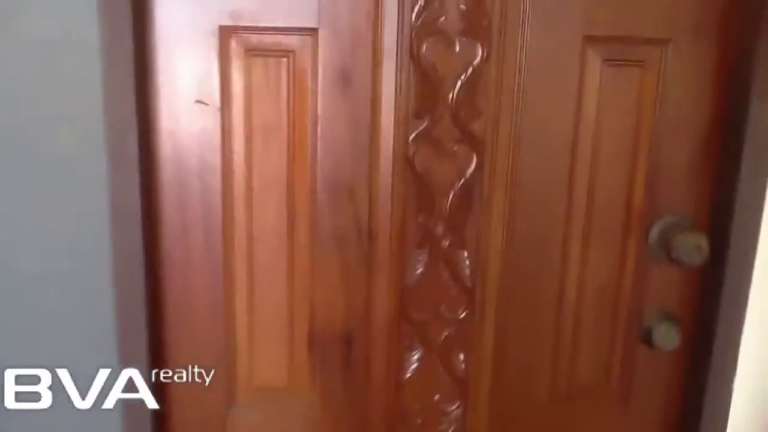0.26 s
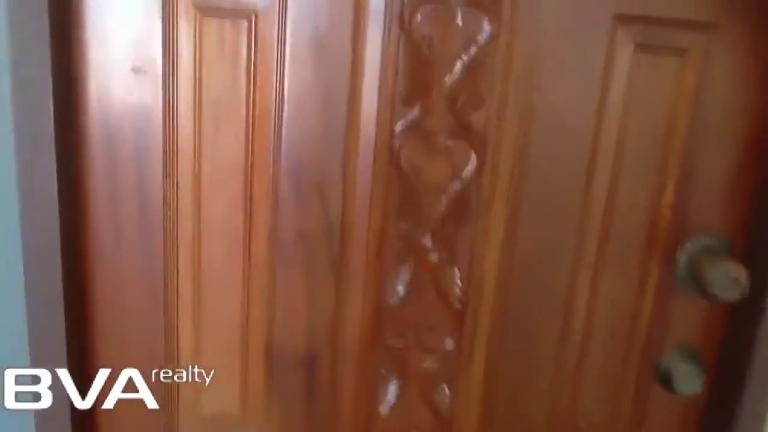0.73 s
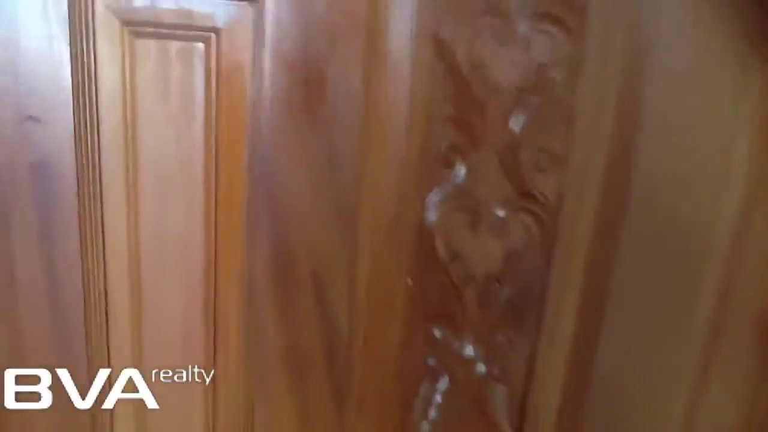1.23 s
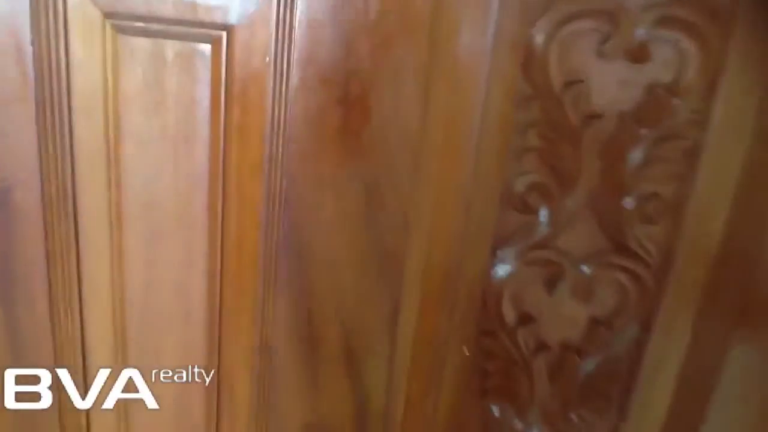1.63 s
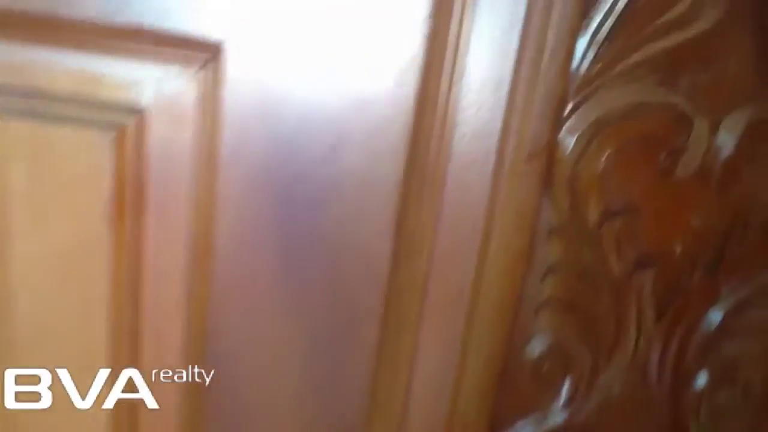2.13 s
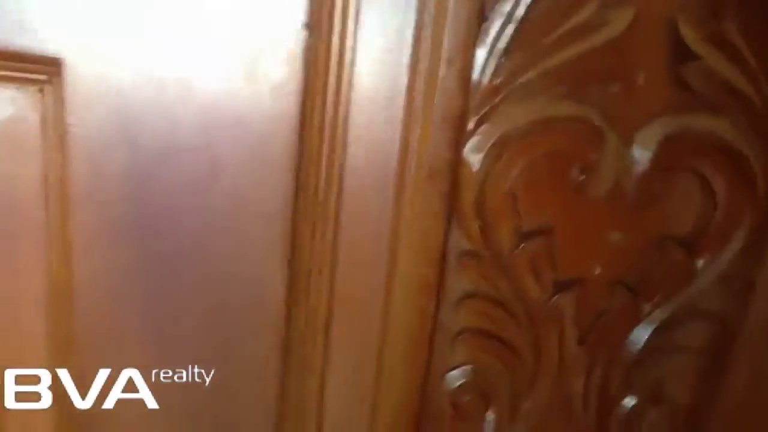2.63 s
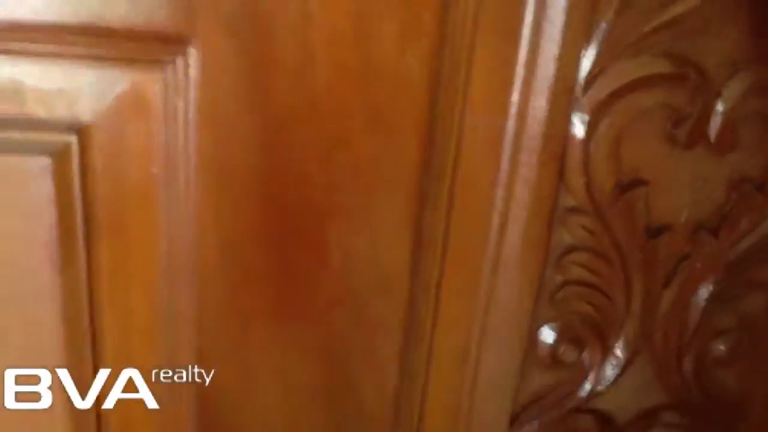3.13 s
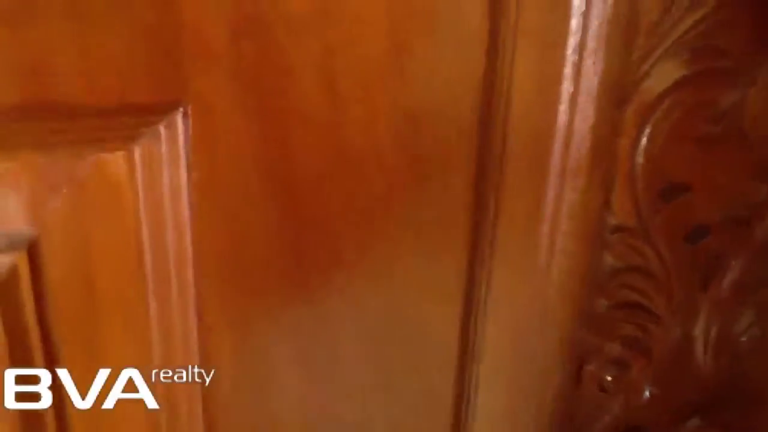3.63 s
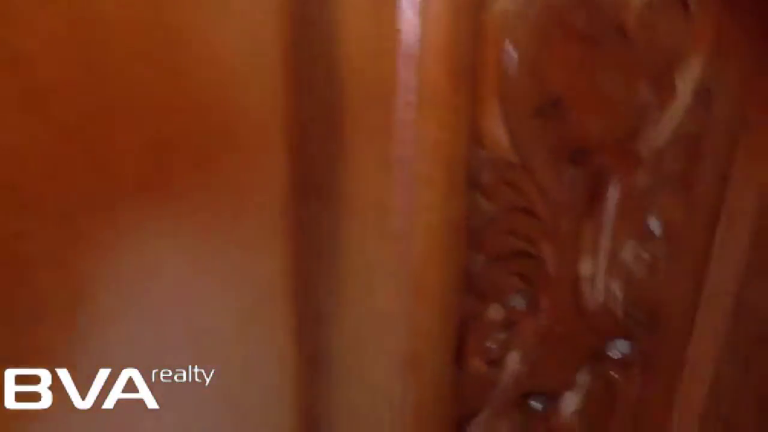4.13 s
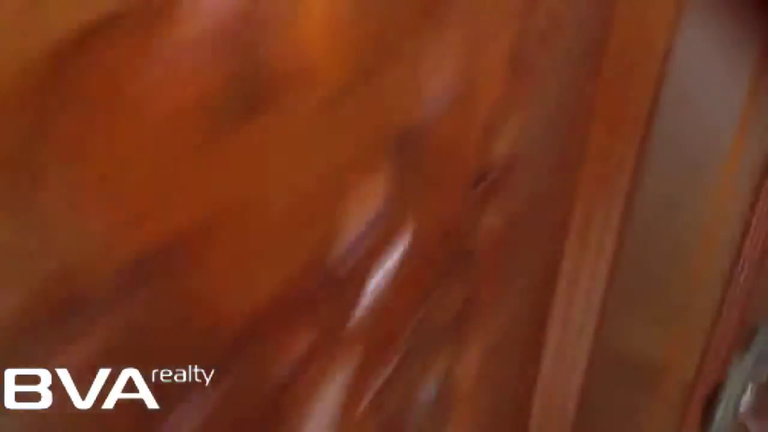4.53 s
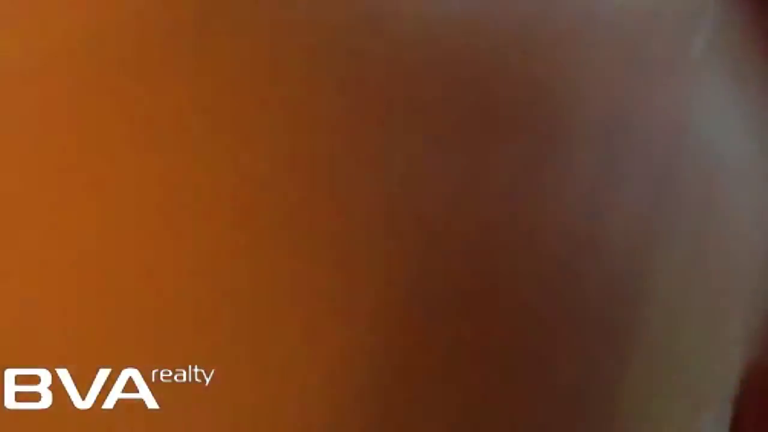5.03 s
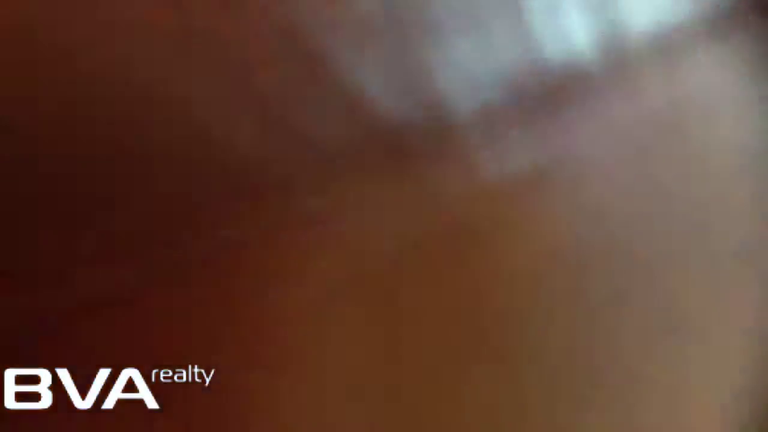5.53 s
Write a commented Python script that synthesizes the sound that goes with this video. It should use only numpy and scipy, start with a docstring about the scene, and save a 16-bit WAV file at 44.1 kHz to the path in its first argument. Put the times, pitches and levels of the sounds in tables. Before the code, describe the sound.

A heavy wooden door is unlatched and swung open indoors, with a little echo from hard walls. Metal clicks and wooden knocks come first, followed by short hinge squeals and a falling creak that breaks into sharp ticks. One soft step thuds with a rustle of clothing, and the hinge ticks again as the microphone moves up to the door. Ventilation hums and rushes quietly underneath throughout.

```python
"""Dry hinges of a heavy wooden door, unlatched and swung open in a hard-walled hall.
Stick-slip at the hinge groans, squeals, sinks into a creak and slows to single ticks.
The latch clicks first: bolt, spring and strike plate ring, the panel knocks.
A footstep and a brush of clothes follow, over ventilation hum and rush.
The door sounds drier as the listener moves up to it."""
import sys
import numpy as np
from scipy import signal
from scipy.fft import rfft, irfft, next_fast_len
from scipy.io import wavfile
from scipy.ndimage import map_coordinates

SR = 44100
rng = np.random.default_rng(int(sys.argv[2]) if len(sys.argv) > 2 else 0)


def digitize_waveform(pressure):
    """Quantize a signal to 16-bit integers and store it at the path in sys.argv[1].

    Rows of a 2-D input are taken as channels; values are limited to [-1, 1].
    """
    field = np.atleast_2d(pressure).T
    bounded = np.clip(field, -1, 1)
    quanta = np.round(bounded * 32767).astype(np.int16)
    wavfile.write(sys.argv[1], SR, quanta)


N = 254898

# First stiff turn; long squeal (time [s], slip rate [Hz], level [dB], overtone gain [dB])
GROAN_PATH = [(2.467, 515, -46, 4), (2.481, 530, -41.5, -1), (2.488, 586, -34.5, -9),
              (2.499, 588, -35, -10), (2.508, 615, -42, 0), (2.515, 635, -49, 7), (2.519, 612, -33.5, -17),
              (2.526, 595, -34, -18)]
SQUEAL_PATH = [(3.670, 824, -46, -1), (3.694, 805, -44.5, 0.5), (3.710, 842, -47, -7),
               (3.724, 826, -54, -2), (3.738, 802, -46, -7), (3.772, 706, -47, -2), (3.798, 722, -51, -3),
               (3.824, 702, -46, -2), (3.842, 730, -50, -3), (3.870, 699, -47, -3), (3.884, 664, -45, -8),
               (3.902, 656, -48, -5), (3.917, 614, -48, -5), (3.956, 629, -45, -4), (3.992, 599, -50, -4),
               (4.035, 610, -57, -3)]
# Hinge squeaks (time [s], length [s], start rate [Hz], end rate [Hz], level [dB], overtone gain [dB])
SQUEAK_EVENTS = [(3.014, .058, 1385, 1320, -49.5, 5.5), (3.53, .045, 1030, 945, -49.5, -4),
                 (3.595, .035, 955, 935, -49, -6)]
# Door response to groan overtones, squeal overtones, their fundamentals (frequency [Hz], gain [dB])
GROAN_SPECTRUM = [(200, -48), (600, -16.5), (1050, -1), (1250, -2.5), (1600, -10), (1820, -18), (2150, -8),
                  (2500, -25), (3500, -18), (4800, -21), (6000, -20), (9000, -64.5)]
SQUEAL_SPECTRUM = [(200, -31.5), (800, -14), (1230, -4), (1410, 8.5), (1630, -7.5), (1880, -4), (2130, -1),
                   (2430, -2), (2680, -9.5), (2900, -10.5), (3250, -11.5), (3600, -13.5), (3800, -15),
                   (4050, -26), (4400, -22.5), (9000, -69)]
FUNDAMENTAL_SPECTRUM = [(600, -4), (660, -1.5), (705, -8), (735, -4.5), (790, -1), (950, -2), (1350, 1)]
# Hinge steel resonance (frequency [Hz], t60 [s], gain [dB])
HINGE_MODE = (2672, .45, -10)
# Slowing creak (time [s], slip rate [Hz])
CREAK_RATE = [(4.264, 412), (4.29, 395), (4.328, 388), (4.355, 330), (4.385, 279), (4.415, 271),
              (4.442, 230), (4.50, 172), (4.545, 132), (4.61, 94), (4.672, 60)]
# Dull push, then a harder, rasping one (time [s], wood [dB], rasp [dB], steel [dB])
CREAK_LEVELS = [(4.264, -48, -59, -72), (4.30, -45.5, -54, -69), (4.335, -48, -55, -69),
                (4.367, -47.5, -55, -63), (4.39, -43.5, -46, -57), (4.425, -45.5, -51, -59),
                (4.455, -47.5, -48, -57), (4.505, -48, -50.5, -56.5), (4.545, -47, -47, -54.5),
                (4.605, -49, -50, -56.5), (4.672, -48, -51, -60)]
# Creak response of wood, rasping leaf, steel (frequency [Hz], gain [dB])
WOOD_SPECTRUM = [(40, -66), (150, -10), (270, 0), (390, 2), (480, 0), (600, 1), (700, -1), (840, 3),
                 (1000, -2), (1200, -6), (1700, -22), (6000, -67)]
RASP_SPECTRUM = [(200, -50), (900, -14), (1120, 1), (1250, -1), (1400, 2), (1600, -2), (1790, -14),
                 (2040, -9), (2400, -12), (3200, -19), (4200, -24), (7000, -60)]
STEEL_SPECTRUM = [(100, -53), (1500, -25), (2400, 1), (3200, 2.5), (4200, 4), (5600, 3.5), (6400, 2),
                  (7300, -1), (7900, -13), (9000, -53)]
# Single hinge slips (time [s], level [dB])
TICK_EVENTS = [(4.68, -50), (4.706, -58.5), (4.802, -37.5), (4.8363, -40), (4.8661, -40), (4.8891, -37),
               (4.908, -42.5), (4.938, -37.5), (4.959, -44.5), (4.982, -48), (5.47, -38.5), (5.4993, -34),
               (5.5316, -31.5), (5.5585, -35), (5.5864, -34), (5.615, -31), (5.646, -38.5), (5.6899, -34),
               (5.7755, -31.5)]
# One slip's crack, hinge leaf, door panel, pin (frequency [Hz], gain [dB])
CRACK_SPECTRUM = [(200, -37), (1300, -5.5), (2200, 4), (2900, 1.5), (3500, 2), (4300, 4.5), (5200, -4),
                  (6000, -4.5), (7000, -54)]
LEAF_SPECTRUM = [(100, -44), (1180, -25), (1380, -2), (1570, -2), (1690, -4), (1810, 2), (2050, 6),
                 (2190, 3), (2350, 4), (2650, -7), (3400, -5), (4500, -17), (5600, -20), (8500, -63.5)]
PANEL_SPECTRUM = [(30, -57), (110, -25), (180, -9), (300, -2.5), (420, -2), (560, 6), (760, -2), (1000, 5),
                  (1200, -6), (2000, -21), (8000, -65)]
PIN_SPECTRUM = [(200, -63.5), (1000, -16), (1330, 16), (1750, 1.5), (2400, 2), (3600, 3.5), (5400, 5.5),
                (7000, 2), (8200, -5), (9300, -24)]
# Pin fading as the listener passes the door (time [s], gain [dB])
PIN_FADE = [(4.8, -2), (5.45, -39.5)]
# Latch and knob clicks; the last row is the click of the footstep
# (time [s], knock [dB], plate [dB], bolt [dB], spring [dB], spring centre [Hz])
CLICK_EVENTS = [(0.3384, -37, -41, -38.5, -34.5, 3020), (0.3425, -41, -50, -49.5, -48, 4300),
                (0.3504, -33.5, -49, -47.5, -52, 3260), (0.380, -37.5, -46, -59, -48, 5550),
                (0.427, -52, -60, -56, -49, 3970), (0.527, -46.5, -58, -58, -53, 3400),
                (2.118, -40, -35, -52, -40.5, 3900), (2.141, -33, -44, -46, -52, 3200),
                (2.157, -35.5, -31.5, -40.5, -35.5, 3930), (2.202, -44.5, -39.5, -41.5, -38, 4400),
                (2.283, -33.5, -47, -58, -50, 4500), (2.369, -41.5, -55.5, -51, -48, 4300),
                (2.404, -40, -38.5, -51.5, -49.5, 4400), (2.546, -57, -41.5, -50, -67, 2470),
                (2.676, -57, -42.5, -45, -45.5, 3800), (2.747, -61.5, -59, -57, -42.5, 5200),
                (2.843, -64, -59, -53, -48.5, 5000), (2.917, -37.5, -40.5, -44, -34.5, 3600),
                (3.256, -47, -44, -51, -44.5, 4770), (5.121, -38.5, -48, -53, -48.5, 4000)]
# Struck wood, strike plate, bolt (frequency [Hz], gain [dB])
KNOCK_SPECTRUM = [(30, -52), (120, -20), (280, 4), (390, -1.5), (520, 3), (680, -11), (950, -19.5),
                  (6000, -69.5)]
PLATE_SPECTRUM = [(100, -50), (380, -8), (550, -9), (700, -3), (850, 1.5), (1000, 0), (1250, -5),
                  (1600, -13), (8000, -59)]
BOLT_SPECTRUM = [(100, -45), (1050, -19), (1500, 4.5), (2000, -1), (2650, 1.5), (3300, -11), (9000, -56.5)]
# Modes of bolt, door panel, floor (frequency [Hz], gain [dB], t60 [s])
PING_MODES = [(2370, -14.5, 0.16), (2690, -13, .22), (3750, -13, .07)]
PANEL_MODES = [(278.3, -1.5, 0.15), (337, -2.5, 0.11), (360.4, -5.5, 0.22), (484, -10, 0.14),
               (544.6, -2.5, 0.14), (597, -2.5, 0.13), (691, -4.5, 0.18), (845, -4, 0.17),
               (990, -3.5, 0.17), (1384, -3.5, 0.12), (1555, -9, 0.16), (1814, -9, .1), (1990, -3.5, 0.085),
               (2100, -8, 0.072), (2354, -5.5, 0.047)]
BOOM_MODES = [(70, -15, 0.64), (98.5, -6, 0.3), (127, 6, 0.12)]
# Door coming free of its frame (time [s], frequency [Hz], level [dB], t60 [s])
FRAME_NOTE = (2.146, 402, -38.5, .2)
# Hand, knob, hinge, clothes (time [s], length [s], centre [Hz], half-width [oct], level [dB])
RUB_EVENTS = [(0.102, 0.055, 1450, 0.28, -51), (0.314, 0.11, 3600, 1, -51.5),
              (0.394, 0.15, 2620, .55, -57.5), (1.194, 0.085, 4300, 1, -57.5),
              (1.427, 0.074, 2140, 0.12, -56), (1.958, 0.088, 706, 0.93, -51),
              (1.975, 0.042, 1990, 0.079, -54), (2.352, 0.13, 3000, 0.28, -65.5),
              (3.071, 0.095, 220, 0.12, -47), (3.177, 0.078, 1820, 0.31, -48), (3.216, 0.12, 950, 0.3, -49),
              (3.219, 0.53, 3900, 0.62, -67.5), (4.854, 0.1, 4420, 0.37, -62.5),
              (5.145, 0.13, 4470, 0.94, -54), (5.419, 0.12, 600, 0.18, -49)]
# Footfall (time [s], level [dB], thud t60 [s])
FOOTFALL = (5.118, -38.5, 0.21)
# Moving air along the walk (time [s], rumble [dB], rush [dB])
AIR_LEVELS = [(0, -52.5, -53.5), (1.25, -57, -54.5), (1.75, -56.5, -52.5), (2.3, -53, -53), (3.7, -48, -52),
              (4.25, -50.5, -53), (5.0, -48, -50), (5.25, -51, -52), (5.6, -48.5, -51),
              (5.78, -50.5, -52.5)]
# Air hiss (time [s], level [dB])
HISS_ENVELOPE = [(0, -60.5), (.9, -61), (1.7, -61), (2.3, -61.5), (2.8, -63), (3.2, -59), (4.1, -61.5),
                 (4.7, -62.5), (5.3, -60.5), (5.78, -65)]
# Air noise bands (frequency [Hz], gain [dB])
RUMBLE_SPECTRUM = [(20, -37), (50, -24), (85, -16.5), (115, -9), (140, -2.5), (210, 3.5), (244, -2.5),
                   (262, -5.5), (285, 1), (340, -8.5), (388, -5), (450, -14), (800, -46.5), (5000, -80.5)]
RUSH_SPECTRUM = [(25, -62.5), (200, -15), (380, 3), (520, 2), (800, 2), (1300, -1), (2000, -8.5),
                 (3200, -39.5), (9000, -76)]
HISS_SPECTRUM = [(50, -47), (1200, -4), (2300, 7), (3500, 5), (5000, 2.5), (7000, -1), (7700, -9),
                 (8300, -23.5), (9500, -69.5)]
# Motor and fan tones through the hall's standing waves (time [s], level [dB])
HUM_ENVELOPE = [(0, -77), (.55, -64.5), (1.08, -55.5), (1.8, -62), (2.0, -73.5), (2.65, -61.5),
                (3.65, -66.5), (4.4, -75), (5.05, -57), (5.78, -73.5)]
OVERTONE_ENVELOPE = [(0, -52), (.19, -51), (.28, -60.5), (4.5, -64.5), (5.03, -54.5), (5.25, -72),
                     (5.78, -66)]
DRONE_ENVELOPE = [(0, -73), (.6, -66.5), (1.95, -51.5), (2.35, -52.5), (2.7, -49), (3.46, -52), (3.68, -56),
                  (4.4, -51.5), (5.4, -53.5), (5.6, -45), (5.78, -55)]
# Hall decay (frequency [Hz], t60 [s])
HALL_DECAY = [(150, 0.88), (1000, 0.34), (3000, 0.36), (9000, 0.098)]

SLIP_ATTACK_S, SLIP_RELEASE_S, SQUEAK_SETTLE_S = 0.0083, 0.015, 0.018
TONE_ABOVE_HZ, CREAK_JITTER_HZ, CREAK_FUNDAMENTAL_DB, CONTACT_DRIFT_HZ = 370, 13, -17, 14
CRACK_DB, LEAF_DB, THUD_DB, PANEL_RING_DB = 1, -0.5, -6, -7.5  # re tick level
SPRING_HALF_WIDTH_OCT, LATCH_RING_DB = 0.45, -17.5
HINGE_SEND_DB, SQUEAL_SEND_DB = -1, 2  # squeals carry furthest into the hall
TOP_HZ = 10000


def stick_slip(rate_hz, gain, overtones_db, spectrum, jitter, flutter_db, rasp_db):
    """Fast slips: harmonics slide through the door's resonances; friction noise pulses once a slip."""
    on = gain > 0
    rate_hz = (rate_hz * (1 + jitter * wobble(400) + 0.0036 * wobble(50)))[on]
    phase = 2 * np.pi * np.cumsum(rate_hz) / SR
    orders = np.arange(2, 10)[:, None]
    flicker_db = flutter_db * np.array([wobble(110)[on] for _ in orders])
    harmonics = np.cos(orders * phase + rng.uniform(0, 2 * np.pi, orders.shape))
    overtones = np.sum(amp(along(spectrum, orders * rate_hz) + flicker_db) * harmonics, axis=0)
    rasp = amp(rasp_db) * noise(spectrum)[on] * (1 + np.cos(phase))
    fundamental = amp(along(FUNDAMENTAL_SPECTRUM, rate_hz) + flutter_db * wobble(140)[on]) * np.cos(phase)
    overtone_gain = np.broadcast_to(amp(overtones_db), N)[on]
    out = np.zeros(N)
    out[on] = np.sqrt(2) * gain[on] * (fundamental + overtone_gain * (overtones + rasp))
    return out


def squeals():
    """The hinge gives three short squeaks, then a long note that sinks as the door slows."""
    out = np.zeros(N)
    for start_s, length_s, start_hz, end_hz, db, overtones_db in SQUEAK_EVENTS:
        age_s = np.maximum(seconds(N) - start_s, 0)
        hz = end_hz + (start_hz - end_hz) * np.exp(-age_s / SQUEAK_SETTLE_S)
        gain = amp(db) * slip_gate(start_s, start_s + length_s)
        out += stick_slip(hz, gain, overtones_db, SQUEAL_SPECTRUM,
                          jitter=0.012, flutter_db=5, rasp_db=-21)
    hz, db, overtones_db = curves(SQUEAL_PATH)
    gain = amp(db) * slip_gate(SQUEAL_PATH[0][0], SQUEAL_PATH[-1][0])
    return out + stick_slip(hz, gain, overtones_db, SQUEAL_SPECTRUM,
                            jitter=0.013, flutter_db=3.5, rasp_db=-16)


def hinge_ring(drive):
    """The steel sings on when a squeal passes its note."""
    hz, t60_s, db = HINGE_MODE
    t = seconds(SR // 2)
    decay = amp(-60 * t / t60_s)
    response = 4 * decay * np.cos(2 * np.pi * hz * t) / decay.sum()
    return amp(db) * signal.fftconvolve(drive, response)[:N]


def groan():
    """The hinge breaks loose in two rough pushes; the pitch rises, the tone gets purer."""
    hz, db, overtones_db = curves(GROAN_PATH)
    gain = amp(db) * slip_gate(GROAN_PATH[0][0], GROAN_PATH[-1][0])
    return stick_slip(hz, gain, overtones_db, GROAN_SPECTRUM, jitter=0.025, flutter_db=3.5, rasp_db=-7.5)


def creak():
    """Fast slips merge into a tone; slower ones separate into taps on wood, leaf and steel."""
    rate_hz, = curves(CREAK_RATE)
    wood_db, rasp_db, steel_db = curves(CREAK_LEVELS)
    gain = slip_gate(CREAK_RATE[0][0], CREAK_RATE[-1][0]) * amp(2.3 * wobble(200))
    cycles = np.cumsum(rate_hz + CREAK_JITTER_HZ * wobble(200)) / SR
    onsets = np.diff(np.floor(cycles), prepend=0) > 0
    slips = onsets * np.sqrt(SR / rate_hz) * gain  # power independent of rate
    tone_share = 1 / (1 + (TONE_ABOVE_HZ / rate_hz) ** 4)
    taps = scattered(slips * amp(wood_db) * np.sqrt(1 - tone_share), t60_s=0.07, scatter=10.0)
    tone = scattered(slips * amp(wood_db) * np.sqrt(tone_share), t60_s=0.058, scatter=0.99)
    rasp = scattered(slips * amp(rasp_db), t60_s=0.058, scatter=3.2)
    steel = scattered(slips * amp(steel_db), t60_s=0.052, scatter=2.8)
    fundamental_rms = amp(CREAK_FUNDAMENTAL_DB + wood_db) * gain * tone_share
    fundamental = fundamental_rms * np.sqrt(2) * np.cos(2 * np.pi * cycles)
    wood = fundamental + coloured(taps + tone, WOOD_SPECTRUM)
    return wood + coloured(rasp, RASP_SPECTRUM) + coloured(steel, STEEL_SPECTRUM)


def scattered(slips, t60_s, scatter):
    """Taps scatter inside the door; the paths change as the contact moves round the pin."""
    t = seconds(SR // 10)

    def response():
        path = scatter * unit(rng.standard_normal(len(t)) * amp(-60 * t / t60_s)) / np.sqrt(len(t))
        path[0] += 1  # direct tap
        return signal.fftconvolve(slips, path / np.linalg.norm(path))[:N]

    blend_rad = np.pi / 4 * (1 + np.tanh(wobble(CONTACT_DRIFT_HZ)))
    return np.cos(blend_rad) * response() + np.sin(blend_rad) * response()


def ticks():
    """Single slips crack and ring the leaf and pin; the panel thuds and rings with a slower onset."""
    def parts():
        return np.array([ring(CRACK_SPECTRUM, t60_s=0.014, attack_s=0.00053),
                         ring(LEAF_SPECTRUM, t60_s=0.052, attack_s=0.0022),
                         ring(PANEL_SPECTRUM, t60_s=0.1, attack_s=0.0053)])

    out = np.zeros(N)
    common = parts()
    for time_s, db in TICK_EVENTS:
        pin_db = np.interp(time_s, *np.transpose(PIN_FADE))
        gains = amp([db + CRACK_DB, db + LEAF_DB, db + THUD_DB])
        add(out, time_s, gains @ (0.51 * common + 0.5 * parts()))
        add(out, time_s, amp(db + pin_db) * ring(PIN_SPECTRUM, t60_s=0.082, attack_s=0.001))
        add(out, time_s, amp(db + PANEL_RING_DB) * panel_ring(spread_db=2.5, attack_s=0.0047))
    return out


def clicks():
    """Latch bolt, spring, plate and wood ring; the door frees with a low note. Last click: the footstep."""
    out, t = np.zeros(N), seconds(SR // 3)
    for time_s, knock_db, plate_db, bolt_db, spring_db, spring_hz in CLICK_EVENTS:
        ping = sum(mode(t, hz, db + rng.normal(0, 1.7), t60_s) for hz, db, t60_s in PING_MODES)
        knock = amp(knock_db) * ring(KNOCK_SPECTRUM, t60_s=0.036, attack_s=0.0019)
        panel = amp(knock_db + LATCH_RING_DB) * panel_ring(spread_db=2.0, attack_s=0.0028)
        plate = amp(plate_db) * ring(PLATE_SPECTRUM, t60_s=0.078, attack_s=0.0011)
        bolt = amp(bolt_db) * (ring(BOLT_SPECTRUM, t60_s=0.088, attack_s=0.00018) + ping)
        spring_band = band(spring_hz, SPRING_HALF_WIDTH_OCT, top_hz=8170)
        spring = amp(spring_db) * ring(spring_band, t60_s=0.036, attack_s=0.00065)
        add(out, time_s, knock + panel + plate + bolt + spring)
    time_s, hz, db, t60_s = FRAME_NOTE
    add(out, time_s, mode(t, hz, db, t60_s) * rise(t, attack_s=0.0026))
    return out


def panel_ring(spread_db, attack_s):
    """Door panel modes; strength and phase vary per strike."""
    t = seconds(SR // 3)
    modes = sum(mode(t, hz, db + rng.normal(0, spread_db), t60_s, phase_cycles=rng.random())
                for hz, db, t60_s in PANEL_MODES)
    return modes * rise(t, attack_s)


def rubs():
    """Brief swells of friction noise, rolled off above about 8 kHz."""
    out, t = np.zeros(N), seconds(SR // 2)
    for time_s, length_s, centre_hz, half_width_oct, db in RUB_EVENTS:
        peak_s = length_s / 4
        swell = t / peak_s * np.exp(1 - t / peak_s)
        friction = coloured(rng.standard_normal(len(t)), band(centre_hz, half_width_oct, top_hz=8260))
        add(out, time_s, amp(db) * swell * friction)
    return out


def footstep():
    """A soft heel thuds and sets the floor booming."""
    out, t = np.zeros(N), seconds(SR)
    time_s, db, thud_t60_s = FOOTFALL
    boom = sum(mode(t, *row) for row in BOOM_MODES)
    add(out, time_s, amp(db) * boom * rise(t, attack_s=0.0065))
    add(out, time_s, amp(db - 8.5) * ring(RUMBLE_SPECTRUM, thud_t60_s, attack_s=0.0042))
    return out


def ventilation():
    """Moving air, motor hum and fan drone; levels shift as the listener crosses the hall."""
    def tone(hz, waver):
        return np.sqrt(2) * np.sin(2 * np.pi * np.cumsum(hz * (1 + waver * wobble(14))) / SR)

    rumble_db, rush_db = curves(AIR_LEVELS)
    hiss_db, = curves(HISS_ENVELOPE)
    hum_db, = curves(HUM_ENVELOPE)
    overtone_db, = curves(OVERTONE_ENVELOPE)
    drone_db, = curves(DRONE_ENVELOPE)
    rumble = amp(rumble_db) * noise(RUMBLE_SPECTRUM)
    rush = amp(rush_db + 0.4 * wobble(9)) * noise(RUSH_SPECTRUM)
    hiss = amp(hiss_db + 1.8 * wobble(6.6)) * noise(HISS_SPECTRUM)
    hum = amp(hum_db) * tone(hz=96.9, waver=0.0081) + amp(overtone_db) * tone(hz=146.0, waver=0.015)
    upper_hum = amp(-62) * tone(hz=243.5, waver=0.0082) + amp(-65) * tone(hz=483.4, waver=0.00865)
    drone = amp(drone_db + 2.1 * wobble(12)) * tone(hz=173.4, waver=0.016)
    return rumble + rush + hiss + hum + upper_hum + drone


def hall(x, predelay_s=0.008):
    """Wall reflections; treble dies first."""
    hz, t, bins = signal.stft(rng.standard_normal(SR), SR, nperseg=256)
    decay = amp(-60 * t / along(HALL_DECAY, hz)[:, None])
    _, tail = signal.istft(bins * decay, SR, nperseg=256)
    delayed = np.pad(x, (round(predelay_s * SR), 0))
    return signal.fftconvolve(delayed, tail / np.linalg.norm(tail))[:N]


def amp(db):
    """Decibels to gain."""
    return 10 ** (np.asarray(db) / 20)


def unit(x):
    """Scale to rms 1."""
    return x / np.sqrt(np.mean(x ** 2) + 1e-20)


def seconds(samples):
    """Time axis."""
    return np.arange(samples) / SR


def along(points, hz):
    """Read (frequency [Hz], value) points on a log axis."""
    knots_hz, values = np.transpose(points)
    return np.interp(np.log(hz + 1), np.log(knots_hz), values)


def curves(rows):
    """One per-sample curve for each column after the time."""
    times_s, *columns = np.transpose(rows)
    return [np.interp(seconds(N), times_s, column) for column in columns]


def wobble(rate_hz):
    """Smooth random curve with knots at rate_hz."""
    knots = rng.standard_normal(int(N * rate_hz / SR) + 4)
    return map_coordinates(knots, [np.arange(N) * rate_hz / SR])


def slip_gate(start_s, end_s):
    """The hinge breaks loose, slips, sticks again."""
    t = seconds(N)
    return np.clip((t - start_s) / SLIP_ATTACK_S, 0, 1) * np.clip(1 - (t - end_s) / SLIP_RELEASE_S, 0, 1)


def rise(t, attack_s):
    """Exponential onset."""
    return 1 - np.exp(-t / attack_s)


def mode(t, hz, db, t60_s, phase_cycles=0):
    """Damped sine."""
    return amp(db - 60 * t / t60_s) * np.sin(2 * np.pi * (hz * t + phase_cycles))


def band(centre_hz, half_width_oct, top_hz):
    """One resonance, rolled off above top_hz (frequency [Hz], gain [dB])."""
    hz = np.geomspace(20, 12000, 90)
    skirt_loss = 1 + (np.log2(hz / centre_hz) / half_width_oct) ** 2
    treble_loss = 1 + (hz / top_hz) ** 18
    return np.column_stack([hz, -20 * np.log10(skirt_loss * treble_loss)])


def coloured(x, spectrum):
    """Minimum-phase filter with unit power gain."""
    size = 4096
    magnitude = unit(amp(along(spectrum, np.fft.rfftfreq(size, 1 / SR))))
    cepstrum = irfft(np.log(magnitude))
    cepstrum[1:size // 2] *= 2
    cepstrum[size // 2 + 1:] = 0
    return signal.fftconvolve(x, irfft(np.exp(rfft(cepstrum))))[:len(x)]


def noise(spectrum):
    """Coloured noise, rms 1."""
    return unit(coloured(rng.standard_normal(N), spectrum))


def ring(spectrum, t60_s, attack_s):
    """Dense modes of a struck part: a decaying noise burst."""
    t = seconds(SR // 3)
    return coloured(rng.standard_normal(len(t)) * amp(-60 * t / t60_s) * rise(t, attack_s), spectrum)


def add(track, time_s, sound):
    """Mix sound into track at time_s."""
    part = track[max(round(time_s * SR), 0):][:len(sound)]
    part += sound[:len(part)]


def scene():
    """Mono mix; the hall's share of the door falls as the listener nears."""
    hinge = groan() + creak()
    singing = squeals()
    singing += hinge_ring(singing)
    contacts = clicks() + ticks() + rubs()
    wet_db, = curves([(0.4, -8.5), (2.1, -9.5), (5.5, -11.5)])  # (time [s], gain [dB])
    walls = amp(wet_db) * hall(contacts + amp(HINGE_SEND_DB) * hinge + amp(SQUEAL_SEND_DB) * singing)
    return (hinge + singing + contacts + walls + footstep() + ventilation())[None]


def record(dry):
    """Brick-wall low-pass at TOP_HZ."""
    size = next_fast_len(N + SR // 2)
    passband = np.fft.rfftfreq(size, 1 / SR) < TOP_HZ
    return irfft(rfft(dry, size) * passband, size)[..., :N]


dry = scene()
out = record(dry)
digitize_waveform(out)
```